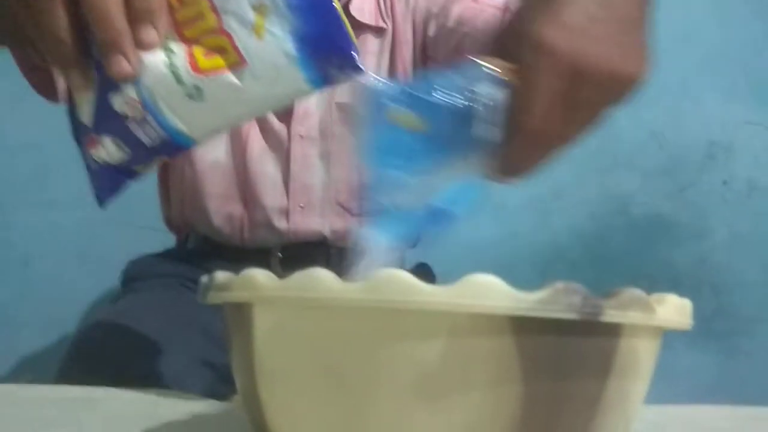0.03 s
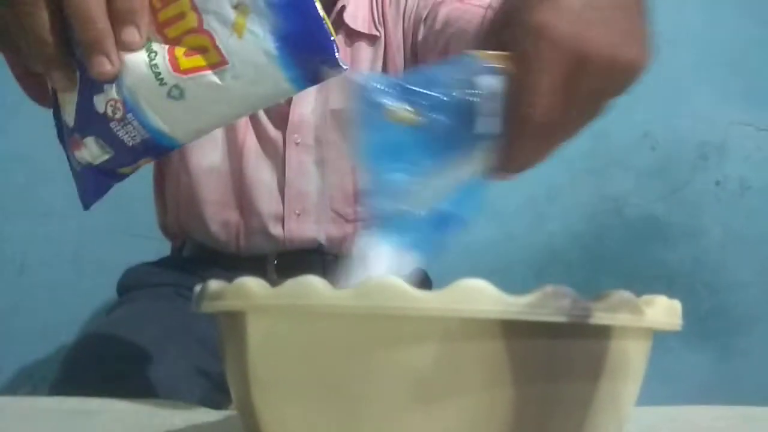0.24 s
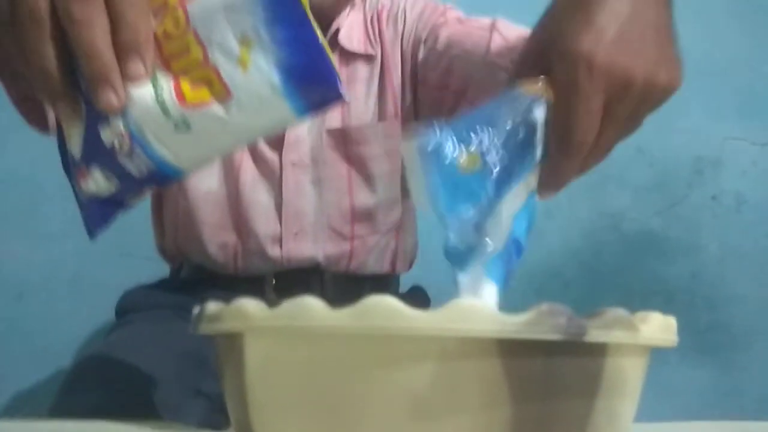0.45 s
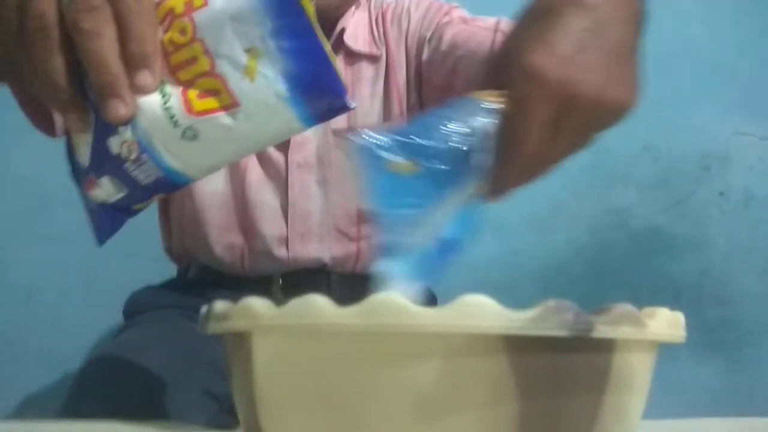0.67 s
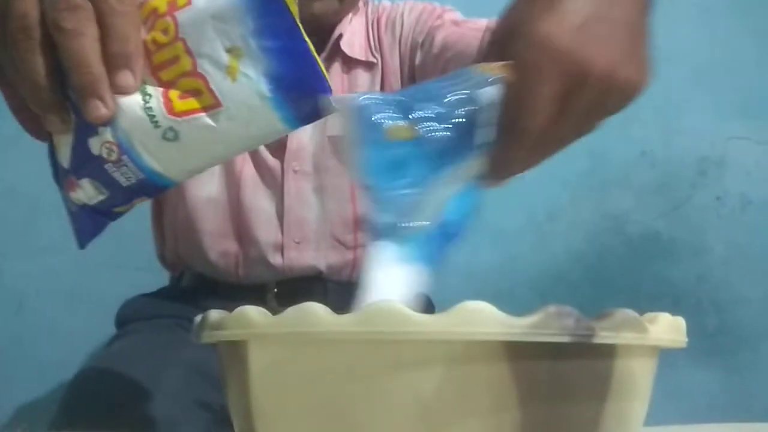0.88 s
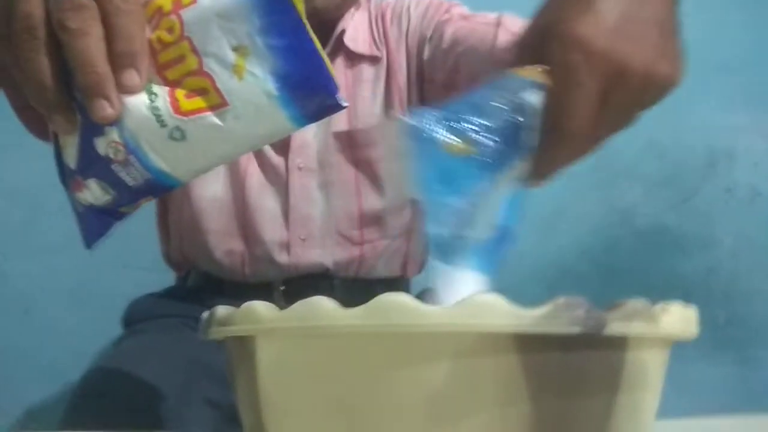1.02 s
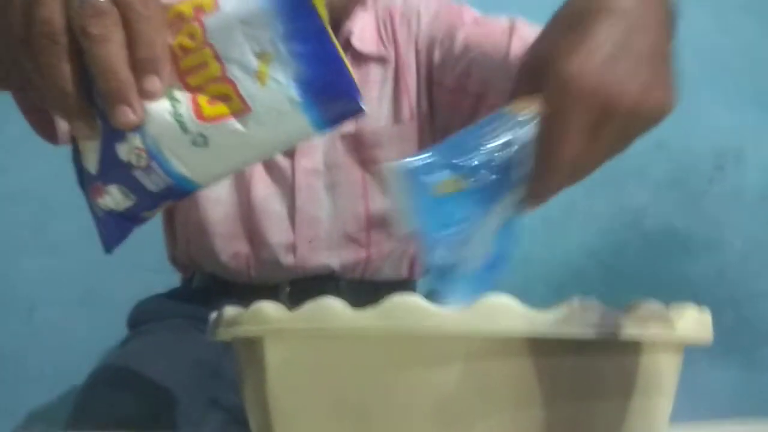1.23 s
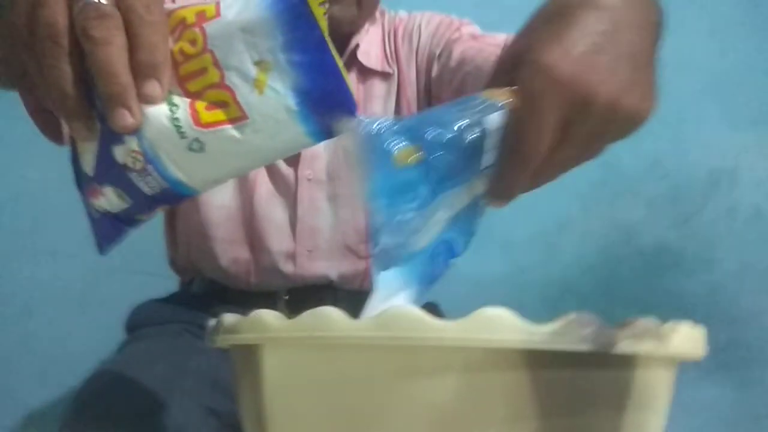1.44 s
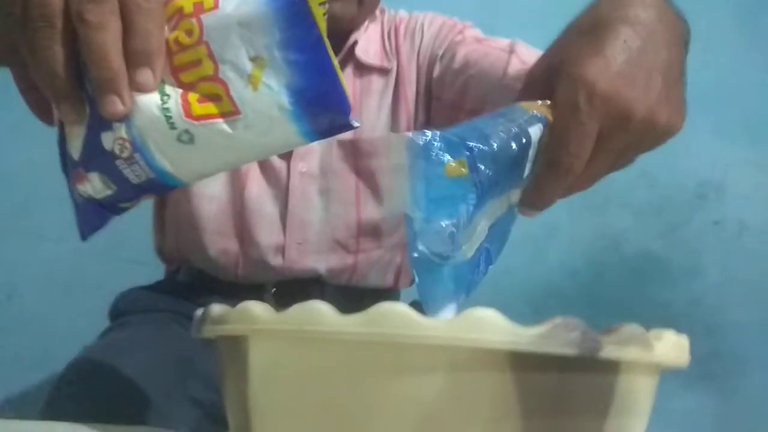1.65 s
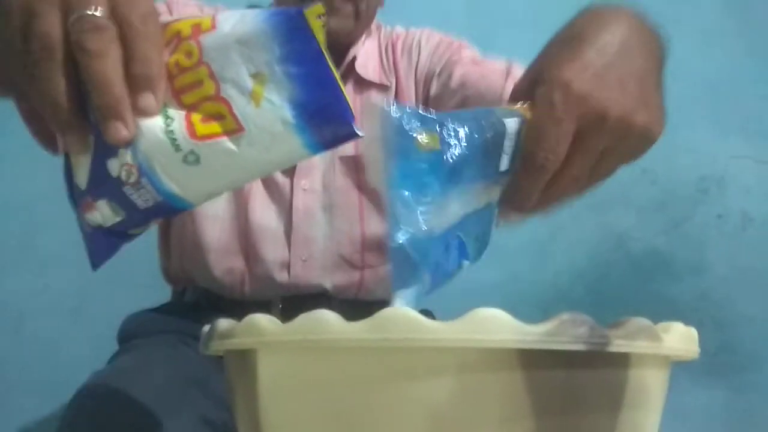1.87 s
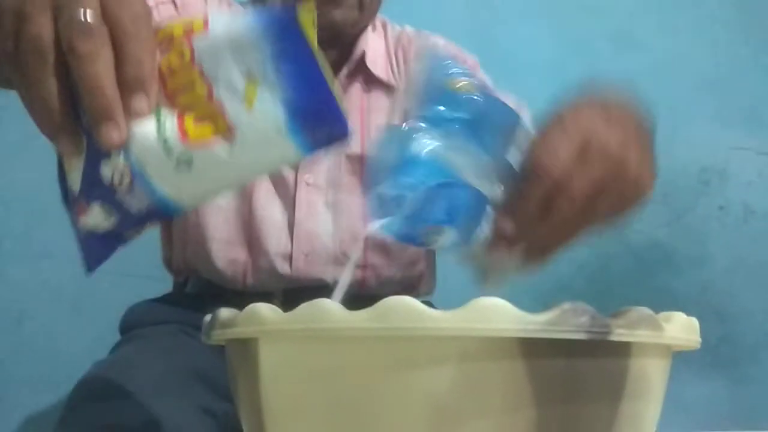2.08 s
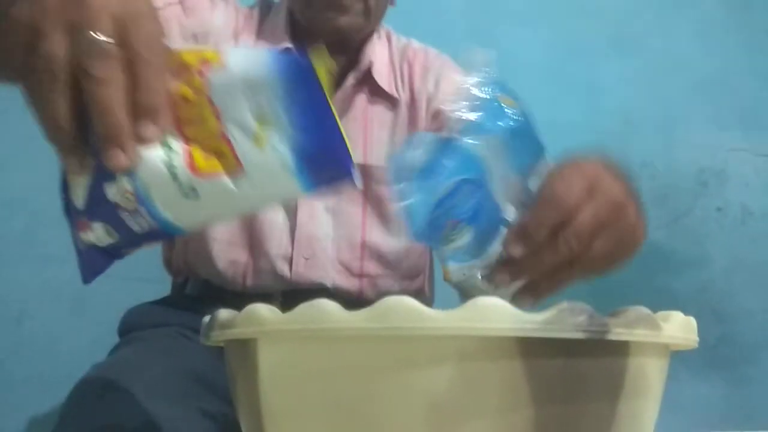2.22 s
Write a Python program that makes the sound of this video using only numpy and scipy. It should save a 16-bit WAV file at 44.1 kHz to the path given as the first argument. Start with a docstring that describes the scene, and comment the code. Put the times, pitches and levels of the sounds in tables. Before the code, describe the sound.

Close stereo pickup of dry powder streaming into a plastic basin, bright and grainy, swelling with each shake; a finger bumps the left side early, then the pour thins out to light plastic ticks and faint room noise.

```python
"""A quiet room: fine powder streams from two plastic packets into a plastic basin close to a stereo microphone.
Random grain clicks make the hiss, which surges as the packets are shaken and echoes off basin and table.
A finger rubs and thumps the left microphone opening; cupped over it, it makes the hiss ring on that side.
The packet film snaps now and then as struck decaying modes; faint wavering tones come from farther off.
Low filtered noise is the room."""
import sys
import numpy as np
from scipy import signal
from scipy.io import wavfile
from scipy.ndimage import map_coordinates

SR = 44100
rng = np.random.default_rng(int(sys.argv[2]) if len(sys.argv) > 2 else 0)


def waveform_to_disk(signal):
    """Save audio, clipped to [-1, 1], as 16-bit WAV at the path in sys.argv[1]."""
    frames = np.transpose(np.atleast_2d(signal))
    scaled = np.clip(frames, -1, 1) * 32767
    samples = np.round(scaled).astype(np.int16)
    wavfile.write(sys.argv[1], SR, samples)


N = 101429


def amp(db):
    """Decibels to an amplitude factor."""
    return 10 ** (np.asarray(db) / 20)


def rms_one(x):
    """Scale to an RMS of 1."""
    return x / np.sqrt(np.mean(x ** 2) + 1e-20)


def in_time(rows):
    """Draw each column as a line over time; the first column holds the seconds."""
    s, *columns = np.transpose(rows)
    return [np.interp(np.arange(N) / SR, s, column) for column in columns]


def at_hz(points, hz):
    """Read a table of (frequency, value) on a logarithmic frequency scale."""
    table_hz, values = np.transpose(points)
    return np.interp(np.log(hz), np.log(table_hz), values)


def drift(rate_hz):
    """Slow chance with an RMS of 1: noise through two equal low-pass poles, made at every 40th sample."""
    pole = np.exp(-80 * np.pi * rate_hz / SR)
    noise = rng.standard_normal(N // 40 + 2002)
    slow = signal.lfilter([1], [1, -2 * pole, pole * pole], noise)[2000:]  # drop the filter's start
    slow = rms_one(slow - slow.mean())
    return np.interp(np.arange(N) / 40, np.arange(len(slow)), slow)


def cut(x, hz, kind, order=4):
    """Butterworth filter."""
    return signal.sosfilt(signal.butter(order, hz, kind, fs=SR, output="sos"), x)


def ring(x, hz, t60_s):
    """Two-pole resonator: a unit click starts a dying sine whose height is 1 before decay."""
    radius = amp(-60 / (t60_s * SR))
    angle = 2 * np.pi * hz / SR
    return signal.lfilter([0, np.sin(angle)], [1, -2 * radius * np.cos(angle), radius ** 2], x + 1e-18)


def grains(per_s, spread_db):
    """Four streams of random clicks of uneven size and either sign; per_s counts each stream."""
    shape = (2, 2, N)
    hits = rng.random(shape) < per_s / SR
    size = amp(spread_db * np.minimum(rng.exponential(1, shape), 5))
    return hits * size * rng.choice([-1, 1], shape)


# left-right likeness: freq_hz, likeness (-1 opposite .. 1 same)
LIKENESS_BY_HZ = [(60, 0.99), (200, 1), (640, 0.83), (1400, -0.35), (3100, 0.63), (5500, 0.54),
                  (7100, -0.12), (9500, -0.13)]


def bands(source, left, right, edges, patchy_db, rate_hz, extra_db=lambda hz: 0):
    """Band by band, give noise its colour on each side, left-right likeness and a chance flicker."""
    out, together = 0, drift(rate_hz)
    for k, (low, high) in enumerate(zip(edges, edges[1:])):
        mid, side = cut(source[k % 2], [low, high], "band", order=3)
        hz = np.sqrt(low * high)
        alike = np.clip(at_hz(LIKENESS_BY_HZ, hz), -1, 1)
        flicker_db = patchy_db * (0.52 * together + drift(2 * rate_hz))
        colour = amp([[at_hz(left, hz)], [at_hz(right, hz)]])
        stereo = np.sqrt(1 + alike) * mid + np.sqrt(1 - alike) * side * [[1], [-1]]
        out = out + amp(flicker_db + extra_db(hz)) * colour * stereo
    return out


# the pour: time_s, flow_db (mid hiss), treble_db (upper treble over it),
# pan_db (left over right), edge_db (low edge of the hiss over it)
POUR_FLOW = [(0, -44, -14, -7, -22), (.06, -51.5, 2, -5, -33), (.15, -41.5, 2.5, -5, -24.5),
             (.26, -35, -0.5, -6, -11), (.33, -34, -5, -3, -10.5), (.45, -37.5, 2.5, 2.5, -7),
             (.56, -39.5, -2, 0, -20), (.66, -40.5, 0, -2.5, -19), (.76, -38.5, -0.5, -2, -23.5),
             (.81, -35.5, -2.5, -2.5, -16), (.92, -31.5, -1, -1.5, -20.5), (1.05, -37.5, 5, -0.5, -5.5),
             (1.17, -40, 6.5, -1, -8), (1.29, -50.5, 18, 1, -14.5), (1.39, -45, 13, -1.5, -24.5),
             (1.44, -38, 7.5, -0.5, -5.5), (1.6, -34, 5.5, 1.5, -15.5), (1.73, -36.5, 4.5, 0.5, -16),
             (1.82, -39, 5, -0.5, -9), (1.9, -36, 6, -1.5, -11), (2.04, -43.5, 2.5, -0.5, -12),
             (2.085, -50.5, 1.5, 0.5, -9.5), (2.14, -50, -2, 2, -28), (2.2, -47, -25, 0, -8),
             (2.3, -60.5, -4, 9, -1)]
# finger cupped over the left opening: time_s, lower_ring_db, upper_ring_db (drive of each resonance)
CUPPING = [(0, 11.5, -5), (.3, 14.5, 0), (.36, 19, 18), (.45, 25.5, 23), (.6, 20, 25), (.75, 21.5, 25.5),
           (.9, 18, 24), (1.05, 20.5, 21.5), (1.18, 13, 23.5), (1.3, 2.5, 2), (1.42, -30, -41)]
# resonances of the cupped opening: centre_hz, width_hz
CUP_RESONANCES = [(9050, 1870), (11000, 1380)]
# relative colour of the grains at each opening: freq_hz, density_db (per Hz)
GRAIN_COLOUR_LEFT = [(1300, -33.5), (1900, -20), (2400, -14.5), (3400, -6.5), (4600, -3.5), (6300, -0.5),
                     (8000, -5.5), (9500, 2), (11400, 1.7), (13400, 0.5), (16000, -5)]
GRAIN_COLOUR_RIGHT = [(1300, -26), (1900, -28), (2400, -16), (3400, -10.5), (4600, -6), (6300, -5.5),
                      (8000, -1), (9500, 2.5), (11400, -0.7), (13400, -8.5), (16000, 0)]
GRAINS_PER_S, GRAIN_SPREAD_DB, GRAIN_FLOOR_HZ = 9000, 2, 1650
TREBLE_HZ, TREBLE_REF_DB = 10800, 2.5
EDGE_HZ, EDGE_REF_DB = 2770, -15
EDGE_CLIMB = 0.086  # the thinner the low edge, the higher it reaches (dB of pitch per dB)


def powder():
    """Thousands of grains of uneven size land each second; the cupped opening rings on the left."""
    flow_db, treble_db, pan_db, edge_db = in_time(POUR_FLOW)
    landing = grains(GRAINS_PER_S, GRAIN_SPREAD_DB)
    edge_hz = EDGE_HZ * amp(EDGE_CLIMB * (EDGE_REF_DB - edge_db))

    def tilt_db(hz):
        treble = (treble_db - TREBLE_REF_DB) / (1 + (TREBLE_HZ / hz) ** 1.9)
        edge = (edge_db - EDGE_REF_DB) / (1 + (hz / edge_hz) ** 13.6)
        return treble + edge

    hiss = bands(landing, GRAIN_COLOUR_LEFT, GRAIN_COLOUR_RIGHT, np.geomspace(900, 17500, 30),
                 patchy_db=1.77, rate_hz=10.0, extra_db=tilt_db)
    hiss = cut(hiss, GRAIN_FLOOR_HZ, "high")
    hiss = hiss / np.std(cut(hiss, [3000, 7000], "band"))  # the mid hiss sets the level
    for (hz, width_hz), cup_db, source in zip(CUP_RESONANCES, in_time(CUPPING), landing[:, 0]):
        bright = cut(rms_one(source), hz / 2, "high")
        ringing = cut(bright, [hz - width_hz / 2, hz + width_hz / 2], "band", order=2)
        hiss[0] += amp(cup_db) * ringing
    return hiss * amp(flow_db + pan_db / 2 * np.array([[1], [-1]]))


ECHO_S, ECHO_DB = .02, -9.5  # longest delay, level of each echo
ECHO_SWAY_S, SWAY_HZ = .00006, 1.69  # the delays wander as the packets move


def echoes(x):
    """Eight early echoes a side off basin and table, with wandering delays; gain offsets their added power."""
    out = x.copy()
    for side in range(2):
        for share in rng.uniform(.1, 1, 8):
            lag = (share * ECHO_S + ECHO_SWAY_S * drift(SWAY_HZ)) * SR
            echo = map_coordinates(x[side], [np.arange(N) - lag], order=3, mode="mirror")
            out[side] += amp(ECHO_DB) * echo
    return out / np.sqrt(1 + 8 * amp(2 * ECHO_DB))


# faint short tones from farther off: start_s, length_s, level_db (RMS before flutter), pitch_hz (at start)
FAR_TONES = [(0, 0.033, -61.5, 290), (0.546, 0.051, -67.5, 658), (0.94, 0.094, -66.5, 422),
             (1.088, 0.17, -67.5, 782), (1.105, 0.04, -63.5, 409), (1.156, 0.02, -52, 720),
             (1.877, 0.054, -74, 1142), (1.561, 0.027, -65.5, 403), (1.958, 0.041, -68, 468),
             (2.208, 0.075, -69.5, 1035)]
TONE_WAVER, TONE_SAG_PER_S = .02, .7  # shares of the pitch
TONE_FLUTTER_DB = 4.5


def tones():
    """Soft single sines that waver and sag in pitch and flutter in level, alike at both openings."""
    t, out = np.arange(N) / SR, np.zeros(N)
    for start_s, length_s, level_db, hz in FAR_TONES:
        swell = np.sin(np.pi * np.clip((t - start_s) / length_s, 0, 1))
        level = 2 * amp(level_db + TONE_FLUTTER_DB * drift(55.0))
        sag = TONE_SAG_PER_S * np.clip(t - start_s, 0, length_s)
        pitch_hz = hz * (1 + TONE_WAVER * drift(36.0) - sag)
        out += swell * level * np.sin(2 * np.pi * np.cumsum(pitch_hz) / SR)
    return out


# relative colour of the room: freq_hz, density_db (per Hz)
ROOM_COLOUR = [(50, -35), (120, -27.5), (174, -9.5), (320, -10.5), (450, -7.5), (650, -16.5), (1000, -12),
               (1500, -25), (3000, -41), (16000, -53)]
# shift of the room's range from about 600 Hz up: time_s, shift_db
ROOM_MIDS_SHIFT = [(0, 1.5), (.6, -4.5), (.95, -0.5), (1.4, 0), (1.9, -2.5), (2.3, 1.5)]
ROOM_DB = -67.5  # RMS


def room():
    """Quiet noise of the room, strongest low down and slightly uneven."""
    shift_db, = in_time(ROOM_MIDS_SHIFT)

    def mids_db(hz):
        return shift_db / (1 + (600 / hz) ** 6)

    noise = bands(rng.standard_normal((2, 2, N)), ROOM_COLOUR, ROOM_COLOUR, np.geomspace(25, 17000, 22),
                  patchy_db=2.0, rate_hz=4.4, extra_db=mids_db)
    return amp(ROOM_DB) * rms_one(noise)


# finger rubbing the left opening: time_s, level_db
RUBBING = [(.2, -102), (.224, -38.5), (.235, -35), (.247, -38.5), (.265, -36), (.32, -39.5), (.345, -31),
           (.39, -41.5), (.43, -45.5), (.475, -52), (.58, -71.5)]
# relative colour of the rubbing: freq_hz, density_db (per Hz)
RUBBING_COLOUR = [(60, -9), (200, -2), (400, -1.5), (700, -11.5), (1100, -16.5), (2200, -18)]
# finger thumps: start_s, strike_db, pitch_hz, t60_s, tick_db (sharp tick over the strike)
FINGER_THUMPS = [(0.2299, -20.5, 270, 0.016, -4), (.234, -13.5, 320, 0.021, -7),
                 (0.306, -18, 262, 0.013, -5), (0.3195, -24, 246, 0.013, -20),
                 (0.339, -8.5, 181, 0.032, -28), (0.37, -21.5, 150, 0.033, -30)]
RUB_CATCHES_PER_S, RUB_RIGHT_DB = 2500, -23  # skin catching; what of it reaches the right opening
RUB_DULLS = 0.63  # a lighter touch loses its upper part first (dB per dB)
THUMP_EDGE_HZ, THUMP_EDGE_DB, THUMP_TICK_HZ = 910, -18.5, 1740
MIC_LOW_HZ = 116


def finger():
    """Catching skin rubs as coloured clicks, thumps ring dully; almost only the left opening hears it."""
    level_db, = in_time(RUBBING)

    def dull_db(hz):
        return RUB_DULLS * np.minimum(level_db + 40, 0) / (1 + (700 / hz) ** 6)

    rub = bands(grains(RUB_CATCHES_PER_S, 2.7), RUBBING_COLOUR, RUBBING_COLOUR, np.geomspace(60, 2400, 11),
                patchy_db=1.5, rate_hz=19.0, extra_db=dull_db)[0]
    rub = rms_one(rub)
    left = amp(level_db) * rub
    for start_s, strike_db, hz, t60_s, tick_db in FINGER_THUMPS:
        click = np.zeros(N)
        click[int(start_s * SR)] = -amp(strike_db)
        soft = np.convolve(click, np.hanning(61) / 30)[:N]  # the soft fingertip rounds the blow
        left += ring(soft, hz, t60_s)
        left += amp(THUMP_EDGE_DB) * ring(click, THUMP_EDGE_HZ, 0.027)
        left += amp(tick_db) * ring(click, THUMP_TICK_HZ, 0.0016)
    right = amp(RUB_RIGHT_DB + level_db) * cut(rub, 400, "high")
    return np.array([cut(left, MIC_LOW_HZ, "high", order=2), right])


# snaps of the packet film: start_s, strike_db
FILM_SNAPS = [(0.2658, -12.5), (2.1446, -29.5), (2.1463, -27.5), (2.1505, -31), (2.154, -34), (2.159, -36),
              (2.1886, -30.5), (2.25, -41)]
# what the film rings with: pitch_hz, level_db (over the strike), t60_s
FILM_MODES = [(3340, -14.5, 0.014), (4550, -20, 0.0054), (6590, -8, 0.008), (8260, -14, 0.0038),
              (10400, -16, 0.0034), (13000, -5, .002)]
CRACK_DB, CRACK_T60_S = -10, 0.012  # burst of noise after each snap


def snaps():
    """Each snap strikes the film's modes with strengths of its own and leaves a short dying crackle."""
    start_s, strike_db = np.transpose(FILM_SNAPS)
    at = (start_s * SR).astype(int)
    jitter_db = rng.normal(0, 1.0, (len(at), len(FILM_MODES), 2))
    bursts = np.zeros(N)
    bursts[at] = amp(strike_db + CRACK_DB)
    decay = amp(-60 / (CRACK_T60_S * SR))
    out = signal.lfilter([1], [1, -decay], bursts + 1e-18) * rng.standard_normal((2, N))
    for k, (hz, mode_db, t60_s) in enumerate(FILM_MODES):
        clicks = np.zeros((2, N))
        clicks[:, at] = amp(strike_db + mode_db + jitter_db[:, k].T)
        out += (-1) ** k * ring(clicks, hz, t60_s)  # neighbouring modes start in opposite directions
    return cut(out, 2840, "high")


def scene():
    """The echoing pour with the tones, room, finger and film snaps added dry."""
    return echoes(powder()) + tones() + room() + finger() + snaps()


CUTOFF_HZ = 15750


def record(dry):
    """A steep elliptic low-pass cuts the top."""
    return signal.sosfilt(signal.ellip(14, .5, 75, CUTOFF_HZ, fs=SR, output="sos"), dry)


dry = scene()
out = record(dry)
waveform_to_disk(out)
```